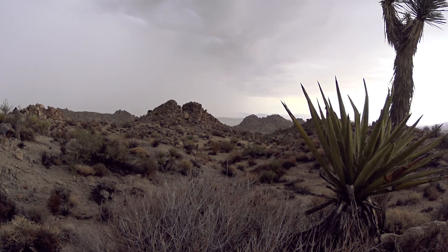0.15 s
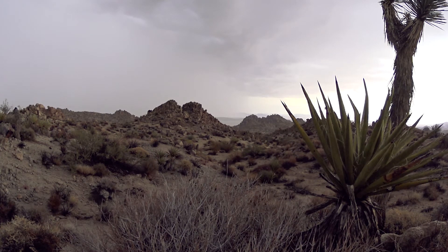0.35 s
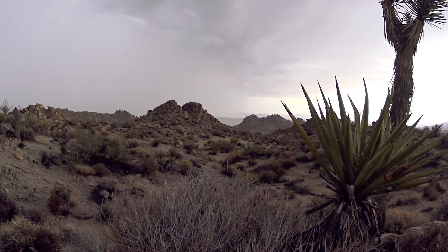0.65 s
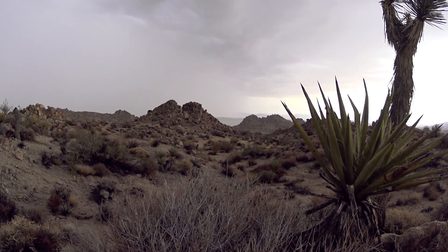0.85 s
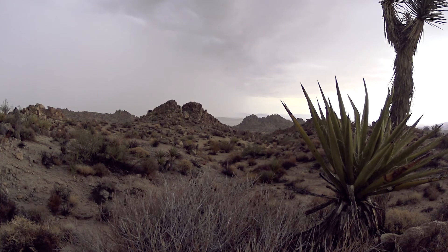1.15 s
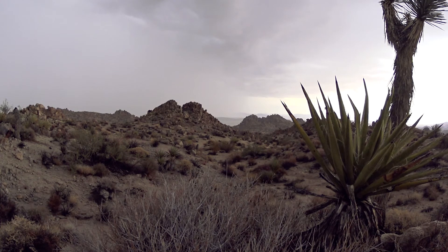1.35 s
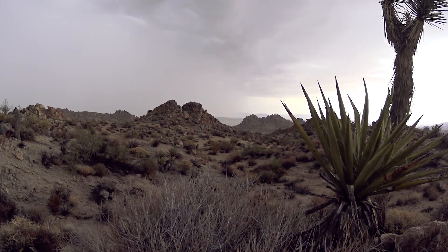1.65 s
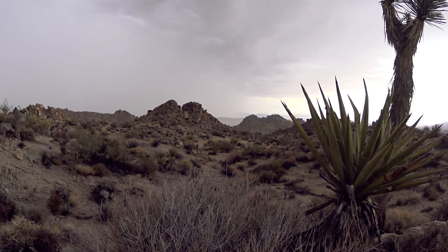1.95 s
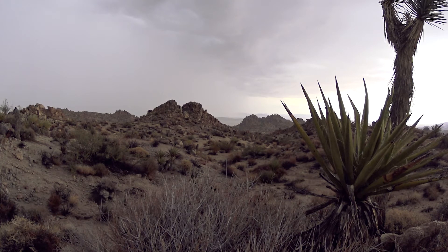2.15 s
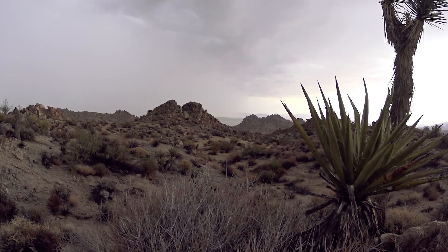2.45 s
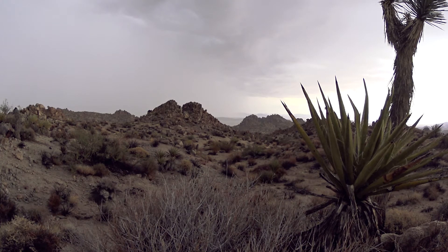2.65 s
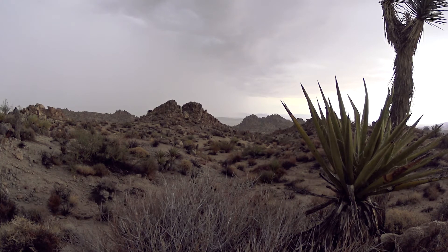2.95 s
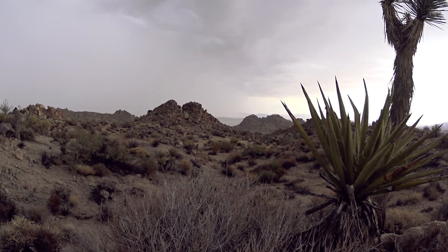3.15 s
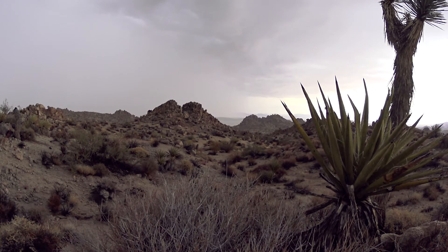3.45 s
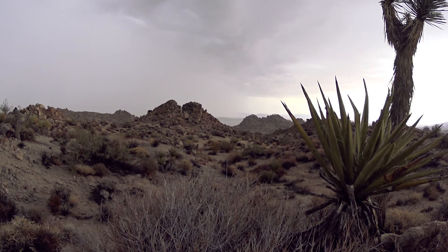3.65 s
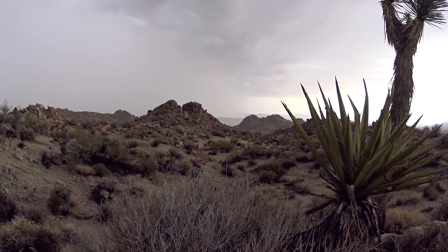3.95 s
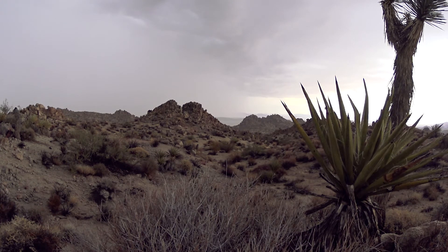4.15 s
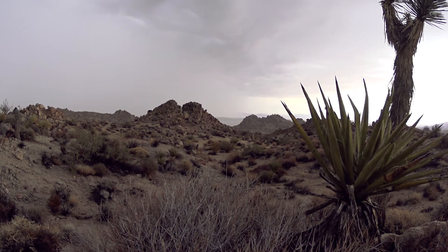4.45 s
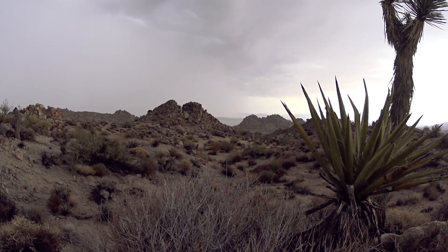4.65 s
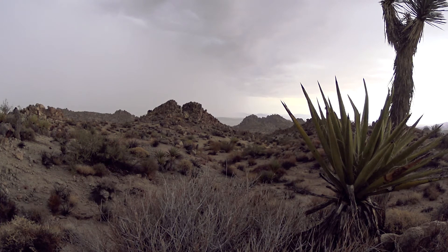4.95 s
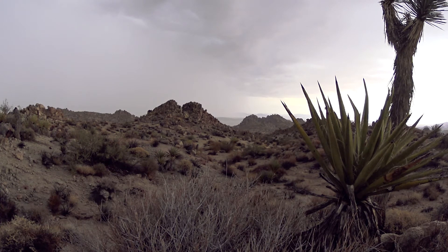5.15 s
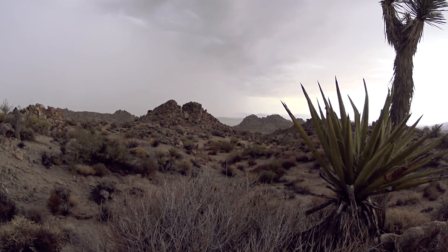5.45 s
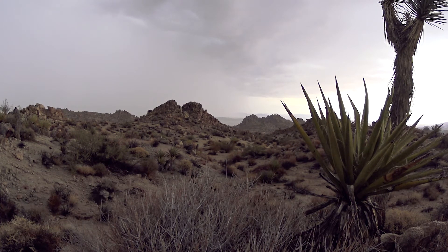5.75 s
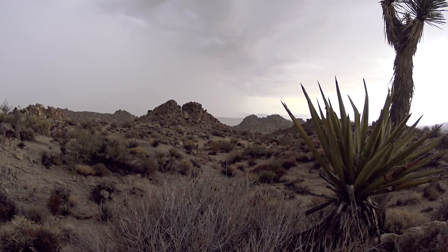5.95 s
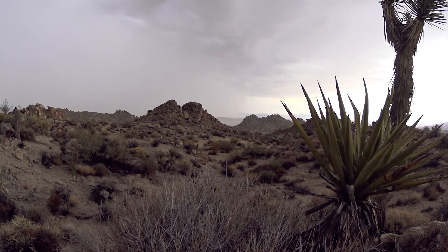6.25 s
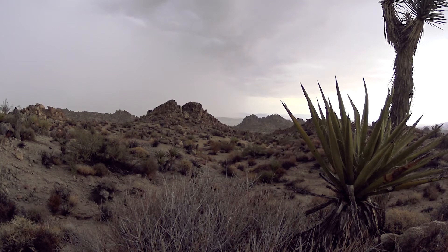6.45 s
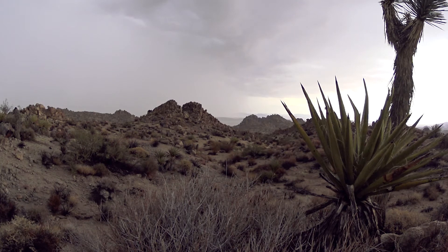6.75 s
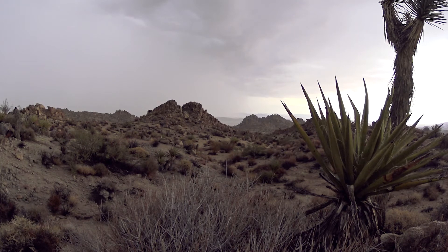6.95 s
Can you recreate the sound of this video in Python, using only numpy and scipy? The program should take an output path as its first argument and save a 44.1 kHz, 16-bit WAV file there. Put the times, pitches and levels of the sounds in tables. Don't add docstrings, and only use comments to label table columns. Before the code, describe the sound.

Low wobbling wind rumble swells and drops away, dotted with hollow raindrop taps, tiny crisp ticks and a very faint fizz of distant rain.

```python
import sys
import numpy as np
from scipy import signal
from scipy.fft import rfft, irfft, next_fast_len
from scipy.io import wavfile
from scipy.ndimage import uniform_filter1d

SR = 44100
rng = np.random.default_rng(int(sys.argv[2]) if len(sys.argv) > 2 else 0)


def boost_factor(decibels):
    exponent = np.asarray(decibels, float) / 20
    return 10 ** exponent


def generate_wav(sig):
    pcm = np.round(np.clip(np.atleast_2d(sig).T, -1, 1) * 32767).astype(np.int16)
    wavfile.write(sys.argv[1], SR, pcm)


N = 313231


def evened(x):
    return x / np.sqrt(np.mean(x ** 2) + 1e-20)


def read(points, hz):
    f, value = np.transpose(points)
    return np.interp(np.log(hz + 1), np.log(f + 1), value)


def shaped(x, points, turn=1):
    size = next_fast_len(N)
    gain = boost_factor(read(points, np.fft.rfftfreq(size, 1 / SR)))
    return irfft(rfft(x, size) * turn * gain, size)[..., :N]


def causal(points):
    level_db = read(points, abs(np.fft.fftfreq(2048, 1 / SR)))
    log_gain = np.log(boost_factor(np.maximum(level_db, -90)))
    return np.fft.ifft(np.exp(np.conj(signal.hilbert(log_gain)))).real[:1024]


def lumps(per_s):
    r = np.exp(-2 * np.pi * per_s / SR)
    return evened(signal.lfilter([1], np.convolve([1, -r], [1, -r]), rng.standard_normal((2, N))))


# (frequency [Hz], density [dB per Hz])
THUMP_SPECTRUM = [(15, -73.5), (28, -53.5), (45, -34), (67, -10.5), (128, 2), (172, -2), (238, -16.5),
                  (260, -22), (340, -39), (570, -120)]
# (frequency [Hz], density [dB per Hz])
FLUTTER_SPECTRUM = [(140, -39.5), (240, -23.5), (280, -9.5), (316, -2), (433, 0.5), (497, -4.5), (788, -23),
                    (1320, -38.5), (1500, -44), (1950, -65), (3300, -120)]
# (time [s], strength [dB], how squarely it crosses the port mouth [dB])
GUST_COURSE = [(0, -47, 1), (.45, -43, 1.5), (1.3, -43.5, 0), (2.05, -38.5, 1), (3.4, -38.5, -2),
               (3.95, -48, 3), (4.03, -41.5, 0), (4.3, -49, 3), (4.75, -44, -8), (4.83, -44, 2),
               (5.731, -47.5, -0.5), (5.8, -56.5, 0), (6.03, -44, -4), (6.3, -62.5, -4), (6.74, -54, -5),
               (6.82, -42.5, -4), (7.0, -44, 3), (7.1, -51.5, -9.5)]


def wind():
    strong_db, thump_db, flutter_db = -40.5, -0.5, -4
    thump_follows, flutter_follows = 1, 1.53
    s, wind_db, square_db = np.transpose(GUST_COURSE)
    t = np.arange(N) / SR
    over_db = np.interp(t, s, wind_db - strong_db)
    square_db = np.interp(t, s, square_db)

    lee = np.clip(0.25 + 0.18 * lumps(per_s=3.64)[0], .005, .995)
    dull_lee = lee ** 3.27
    puffs = lumps(per_s=8.0)[0]
    puffs = evened(puffs - uniform_filter1d(puffs, size=SR // 4))
    puffs = puffs * (1 - 0.068 * over_db)
    shared = lumps(per_s=20.0)

    thump = evened(shaped(rng.standard_normal((2, N)), THUMP_SPECTRUM))
    thump = evened(thump * boost_factor(0.57 * shared + 0.58 * puffs))
    thump = thump * np.sqrt([1 - lee, lee])
    thump = thump * boost_factor(strong_db + thump_db + thump_follows * over_db)

    flutter = evened(shaped(rng.standard_normal((2, N)), FLUTTER_SPECTRUM))
    flutter = evened(flutter * boost_factor(0.79 * shared + 1.74 * lumps(per_s=75.0) + 1.24 * puffs))
    flutter = flutter * np.sqrt([1 - dull_lee, dull_lee])
    flutter = flutter * boost_factor(strong_db + flutter_db + flutter_follows * over_db + square_db)
    return thump + flutter


def splash(t60, count):
    t = np.arange(2600) / SR
    return rng.standard_normal((count, len(t))) * boost_factor(-60 * t / t60)


def struck(drive, colour):
    x = signal.oaconvolve(drive, colour[None], axes=1)[:, :drive.shape[1]]
    return x / np.sqrt(uniform_filter1d(x ** 2, size=66).max())


# (frequency [Hz], density [dB per Hz])
KNOCK_SPECTRUM = [(80, -70), (350, -20), (600, -17), (726, -17), (1070, -3), (1480, -5.5), (2070, -13),
                  (2560, -14), (3050, -20.5), (4000, -46), (5200, -66), (8800, -120)]
# (frequency [Hz], level [dB], t60 [s])
HOUSING_MODES = [(1005, -9, 0.061), (1186, -6, 0.082), (1393, -10.5, 0.043), (1640, -7, 0.008),
                 (2380, -19.5, 0.012), (3030, -20.5, .014)]


def knock(knock_db, bright_db, port_db):
    t = np.arange(2600) / SR
    heavy = boost_factor(0.11 * (knock_db + 13.0))
    after = np.clip(t / .004, 0, 1) ** 2
    rattle = signal.lfilter([.3], [1, -.7], splash(0.024 * heavy, count=3))
    drive = 0.16 * after * rattle

    own_hz = 1450 * 2 ** np.clip((bright_db + 9.5) / 4.9, -.6, .8)
    own_ring = np.clip(t / .0012, 0, 1) * boost_factor(-60 * t / 0.013) * np.sin(2 * np.pi * own_hz * t)
    drive[:2] -= 0.036 * own_ring

    for hz, db, t60 in HOUSING_MODES:
        strength, detune = rng.uniform(-0.92, 1, (2, 3, 1))
        wobble = .5 + 5.8 * uniform_filter1d(rng.standard_normal((3, len(t))), size=40)
        decay = boost_factor(db - 60 * t / (t60 * heavy))
        sagging = t * (1 - 2.5 * t)
        ring = np.sin(2 * np.pi * hz * (1 + 0.11 * detune) * sagging)
        drive += 0.029 * after * wobble * decay * strength * ring

    drive[[0, 0, 1], [0, 12, 21]] += [.35, -1, -1]
    bounce = rng.integers(14, 34)
    drive[:, bounce:] += rng.uniform(-0.72, 0.64) * drive[:, :-bounce].copy()

    tilt_db = bright_db + 5.0
    colour = [(hz, db + tilt_db * np.clip(np.log2(hz / 1600), -1.2, .7)) for hz, db in KNOCK_SPECTRUM]
    dull = [(hz, db - 4.7 * np.log2(hz / 1000)) for hz, db in colour]
    sides = np.array([[1], [-1]])
    both = struck(drive[:1] + .5 * sides * drive[2], causal(colour))
    one = struck(drive[1:2], causal(dull))
    return (both + boost_factor(port_db) * sides * one) / np.sqrt(1 + boost_factor(2 * port_db))


# (frequency [Hz], density [dB per Hz])
TICK_SPECTRUM = [(2650, -9), (4500, -28.5), (5070, -17), (5940, -7), (6560, -5), (7870, 0.5), (9520, 0),
                 (10800, -4), (11200, -15.5), (12400, -39.5), (15700, -76), (22000, -120)]


def tick(tick_db):
    crack = splash(0.006, count=3)
    spray = .11 * splash(.022, count=2)
    thin_db = .5 * min(tick_db + 33, 0)
    thin = [(hz, db + thin_db * np.clip(np.log2(8500 / hz), 0, 1)) for hz, db in TICK_SPECTRUM]
    return struck(crack[0] + 0.7 * crack[1:] + spray, causal(thin))


def add(mix, s, sound):
    part = mix[:, round(s * SR):][:, :sound.shape[1]]
    part += sound[:, :part.shape[1]]


def drop_impact(mix, s, knock_db, tick_db, bright_db, pan_db, port_db):
    sides = np.array([[1], [-1]])
    knock_gain = boost_factor(knock_db + 1.5 + 0.26 * (pan_db - 0.5) * sides)
    add(mix, s - .0005, knock_gain * knock(knock_db, bright_db, port_db))
    add(mix, s - .0006, boost_factor(tick_db + 2.5 + .5 * pan_db * sides) * tick(tick_db))


# (time [s], knock level [dB], tick level [dB], knock brightness [dB], left-right [dB])
SQUARE_DROPS = [(0.0115, -35.5, -42.5, -10, 3), (0.324, -51.5, -51, -2.5, 8),
                (0.6478, -23.5, -31.5, -5, 5.5), (0.8825, -45.5, -50.5, -8.5, 4), (1.1289, -46, -50, -7, 0),
                (1.841, -53, -51.5, -9, 3), (1.8615, -49.5, -55.5, -6.5, 6), (1.892, -40.5, -43.5, -3, 3),
                (2.1277, -37.5, -57, -6, 9), (2.6429, -35, -36.5, -5, 4.5), (2.758, -38.5, -43.5, 0.5, 0),
                (3.2811, -32.5, -48.5, -8.5, 9), (3.541, -38, -51.5, -6.5, 6), (4.0674, -52, -53, 0, 2),
                (4.594, -47.5, -60, -2, -2), (4.636, -21.5, -37, -8, 9), (5.0682, -52, -62.5, -7.5, 1),
                (5.3688, -32.5, -35, -6.5, 6.5), (5.4329, -41.5, -55, 1, 13), (6.5496, -56.5, -68, -6, 7),
                (6.6992, -49.5, -55, 2, 4), (6.8143, -37.5, -47.5, -8.5, 5), (7.0148, -40, -44, 1.5, 1),
                (7.062, -37.5, -51, -7.5, 7)]


def square_drops(mix):
    for s, knock_db, tick_db, bright_db, pan_db in SQUARE_DROPS:
        port_db = -9 + 0.38 * (knock_db + 40)
        drop_impact(mix, s, knock_db, tick_db, bright_db, pan_db, port_db)


# (time [s], knock level [dB], tick level [dB], knock brightness [dB])
EDGE_DROPS = [(0.251, -47.5, -47, 10), (0.6061, -53, -72, -23), (0.886, -49, -60, -14),
              (0.9351, -37, -54, -5), (1.743, -53.5, -61, -1), (2.1807, -40.5, -53, -8),
              (2.188, -66, -60, -1), (2.287, -58.5, -61, 1), (2.3806, -57.5, -59, 17),
              (3.486, -50, -41.5, -9), (3.7571, -38, -53, -7.5), (4.393, -43, -60, -6.5),
              (4.664, -49, -56, -24), (4.9508, -51.5, -52.5, 7), (5.29, -41.5, -58.5, -9),
              (5.4195, -53, -60, -2), (5.4415, -52, -53, 1), (5.4525, -36.5, -51, -1.5),
              (5.457, -35.5, -48.5, -5), (5.8238, -45, -73, -14.5), (5.8927, -40, -63, -27),
              (5.912, -55, -53, 7), (5.998, -49, -60, -5.5), (6.0273, -33, -53.5, -6.5),
              (6.2688, -56, -67, -7.5), (6.6684, -55.5, -69, 5), (6.743, -35, -70, -8.5),
              (6.8378, -50, -46.5, -3), (6.978, -42, -59, -13.5), (7.0458, -51, -57, -9)]


def edge_drops(mix):
    for s, knock_db, tick_db, bright_db in EDGE_DROPS:
        drop_impact(mix, s, knock_db, tick_db, bright_db, pan_db=0.5, port_db=2 - .5 * bright_db)


# (frequency [Hz], density [dB per Hz])
SNAP_SPECTRUM = [(3000, -46), (5500, -8), (10000, 1), (15300, -7), (16600, -61)]
# (time [s], snap level [dB], left-right [dB])
SNAPS = [
    (.2585, -61, 4),
    (.2505, -67, -12),
    (.9348, -61, -17),
    (2.4868, -64, 14),
    (3.2805, -56, 25),
    (3.5389, -41, 25),
    (5.4527, -59, 3),
    (7.06, -54, 22),
]


def snaps(mix):
    for s, snap_db, pan_db in SNAPS:
        gain = boost_factor(snap_db + np.minimum(pan_db * np.array([[1], [-1]]), 0))
        add(mix, s, gain * struck(splash(0.0018, count=1), causal(SNAP_SPECTRUM)))


# (time [s], tick level [dB])
GROUND_DROPS = [(0.0018, -58), (0.2256, -60), (0.384, -55), (0.5712, -52), (0.8586, -50.5), (1.2234, -55.5),
                (1.2998, -58), (1.4042, -61), (1.6929, -60), (1.822, -57.5), (2.1673, -54), (2.4876, -51.5),
                (3.0104, -61), (3.0798, -54.5), (3.4077, -48), (3.7064, -57), (3.8536, -58), (3.961, -55),
                (4.098, -51), (4.1402, -51), (4.3778, -57), (4.5333, -51), (4.76, -57), (4.8243, -59),
                (4.9712, -51), (5.8527, -58.5), (5.9633, -60), (6.1858, -51), (6.7068, -59), (6.778, -58)]


def ground_drops(mix):
    for s, tick_db in GROUND_DROPS:
        drop_impact(mix, s, tick_db - 11.5, tick_db, bright_db=-3.0, pan_db=5.5, port_db=1.5)


def far_drops(mix):
    for place, size in rng.uniform((0, -1), 1, (50, 2)):
        tick_db = -61 + 3 * size
        add(mix, place * N / SR, boost_factor(tick_db + 2.9 * np.array([[1], [-1]])) * tick(tick_db))


# (frequency [Hz], density [dB per Hz])
FIZZ_SPECTRUM = [(160, -45.5), (280, -22), (478, 1.5), (605, 0), (778, 2), (896, -0.5), (1030, -1),
                 (2570, -9), (4320, -40), (6710, -13), (9330, -6.5), (11000, -12), (11250, -42),
                 (12200, -48), (15600, -82), (22000, -120)]


def fizz():
    spread = boost_factor(7.5 * np.minimum(rng.exponential(1, N), 3.3))
    falls = rng.random(N) < 600. / SR
    size = spread * falls * rng.choice([-1, 1], N)
    lean = rng.uniform(0, np.pi / 2, N)
    grains = evened(size * np.array([np.cos(lean), np.sin(lean)]))
    tail = splash(0.015, count=1) / 3.6
    grains = grains + 1.0 * signal.oaconvolve(grains, tail, axes=1)[:, :N]
    bright = shaped(grains, [(2000, -4.5), (6000, -3.5)])
    hiss = rng.standard_normal((2, N)) * boost_factor(1.4 * lumps(per_s=24.0) + 1.1 * lumps(per_s=150.))
    return boost_factor(-70) * evened(shaped(hiss + boost_factor(-8.5) * bright, FIZZ_SPECTRUM))


# (frequency [Hz], gain [dB])
WIDENING = [(50, -18.5), (130, -5.5), (340, 1), (600, 4), (1500, 5.5), (3500, 3), (6000, -2), (11000, 1.5)]


def widened(ports):
    side = shaped(ports[0] - ports[1], WIDENING, turn=1j)
    return ports.sum(0) + np.outer([1, -1], side)


# (frequency [Hz], left-right [dB])
FIZZ_LEAN = [(60, -8), (170, 4), (490, -4), (1420, 0.5), (4060, -0.5), (11600, 3.5)]


def far_rain():
    left, right = widened(fizz())
    left = shaped(left, [(hz, db / 2) for hz, db in FIZZ_LEAN])
    right = shaped(right, [(hz, -db / 2) for hz, db in FIZZ_LEAN])
    return np.array([left, right])


def scene():
    mix = widened(wind())
    square_drops(mix)
    edge_drops(mix)
    snaps(mix)
    ground_drops(mix)
    far_drops(mix)
    return mix + far_rain()


def top_cut(x):
    return signal.sosfilt(signal.butter(12, 16600, fs=SR, output="sos"), x)


def record(dry):
    return top_cut(dry)


dry = scene()
out = record(dry)
generate_wav(out)
```